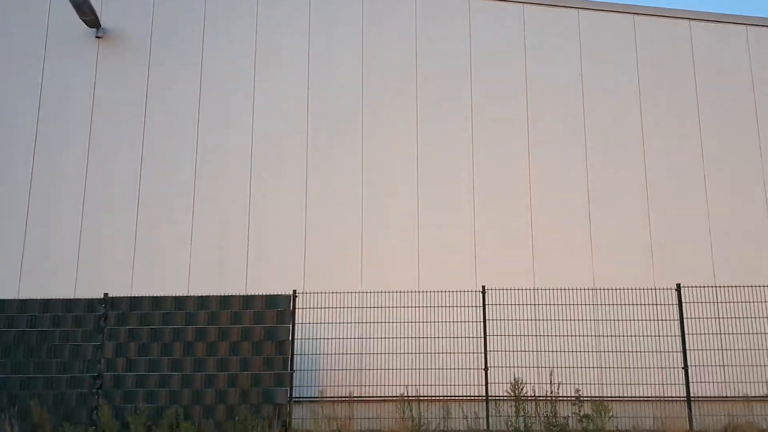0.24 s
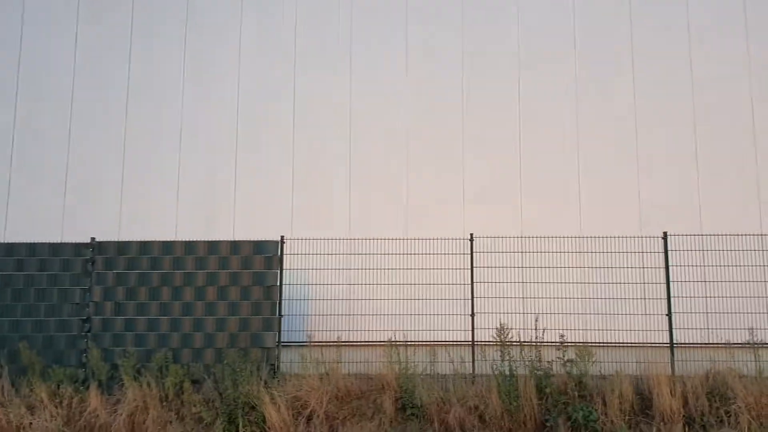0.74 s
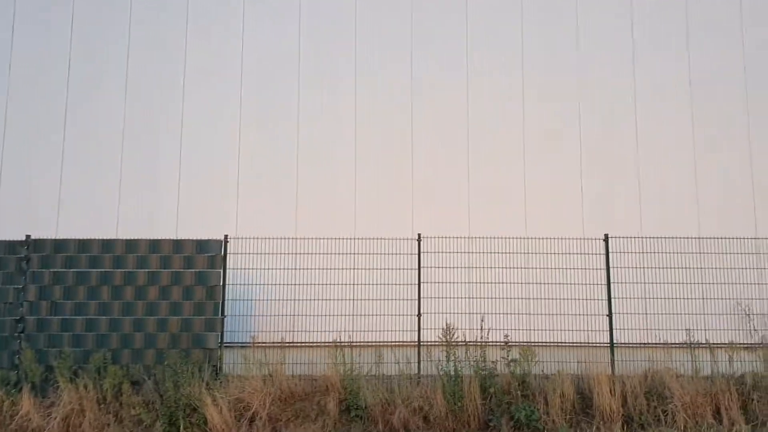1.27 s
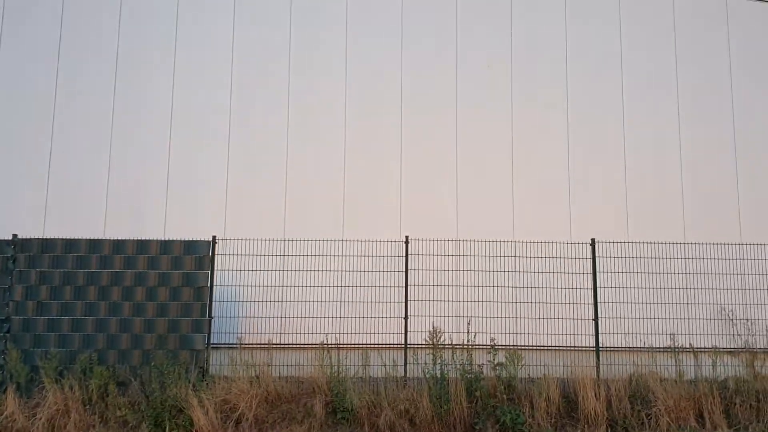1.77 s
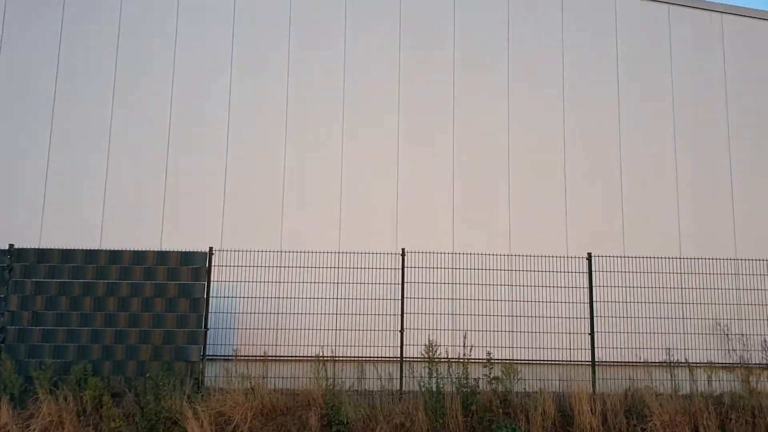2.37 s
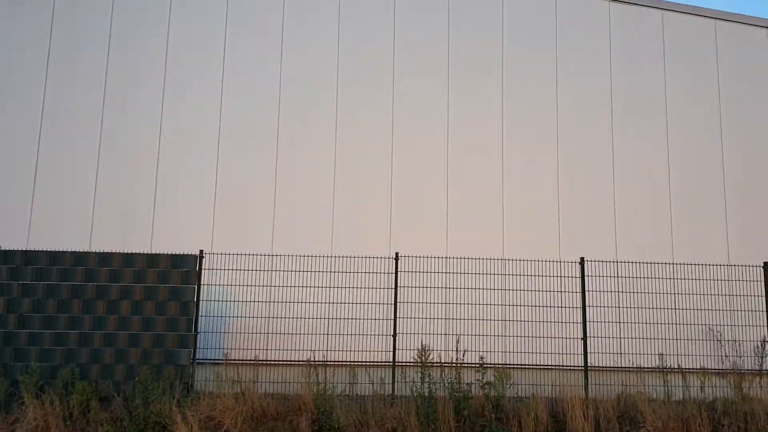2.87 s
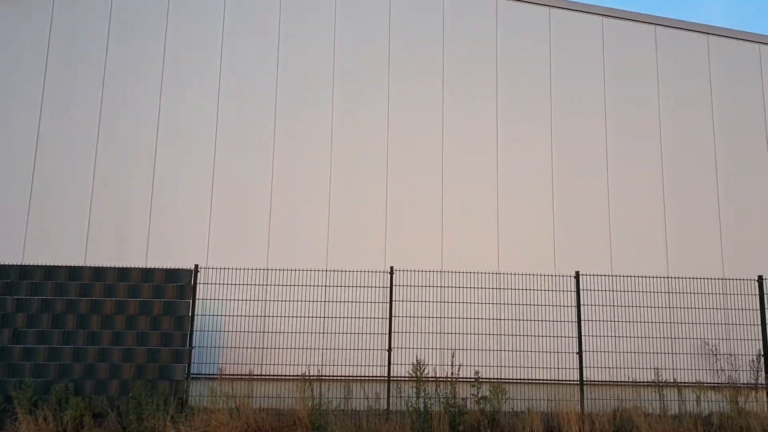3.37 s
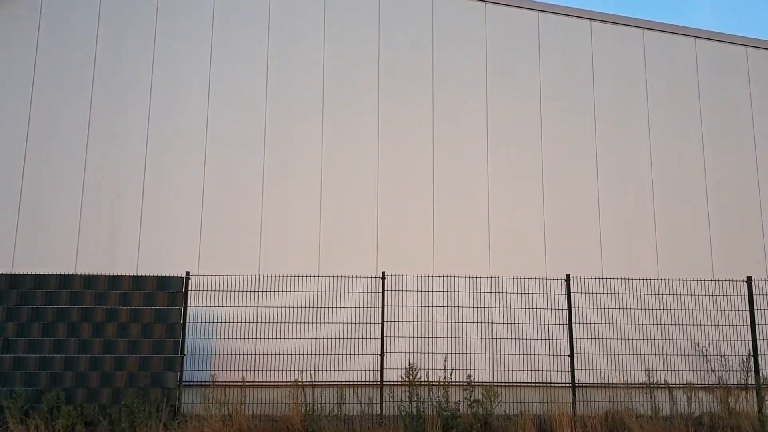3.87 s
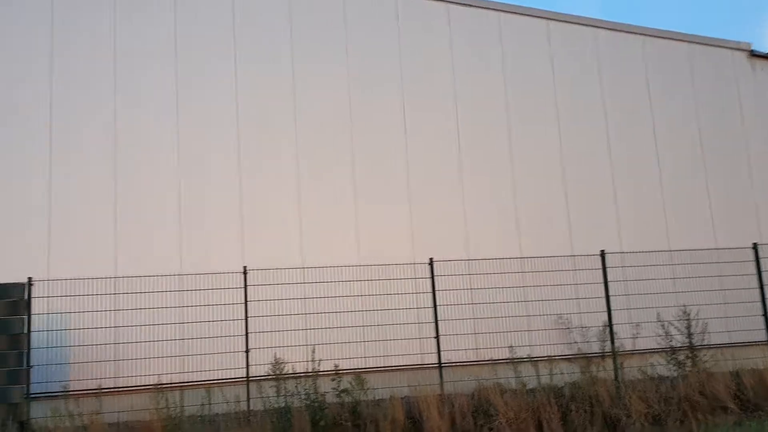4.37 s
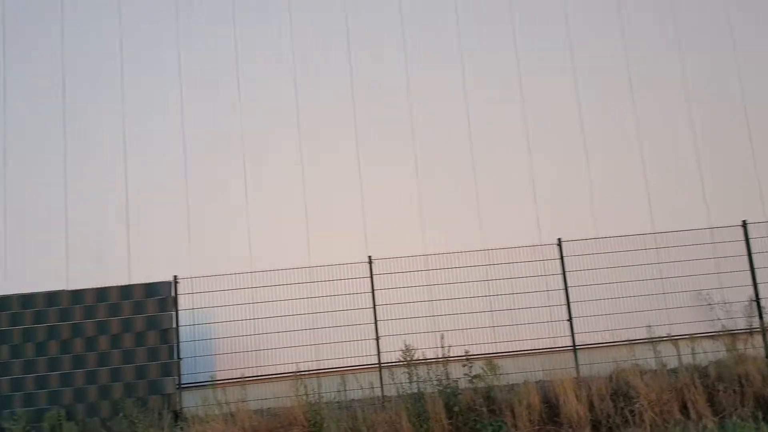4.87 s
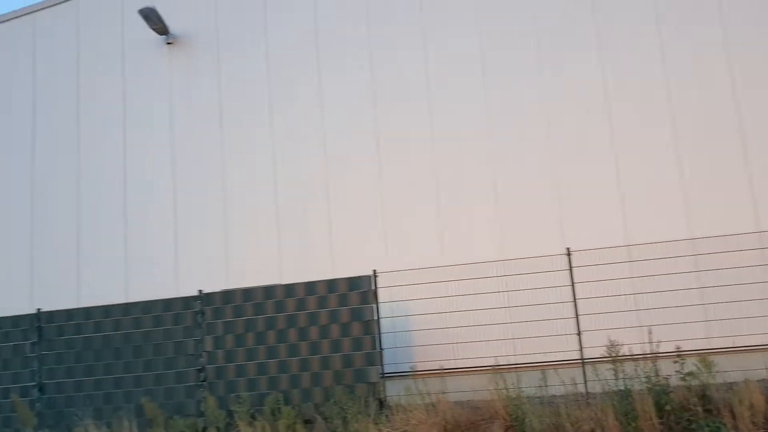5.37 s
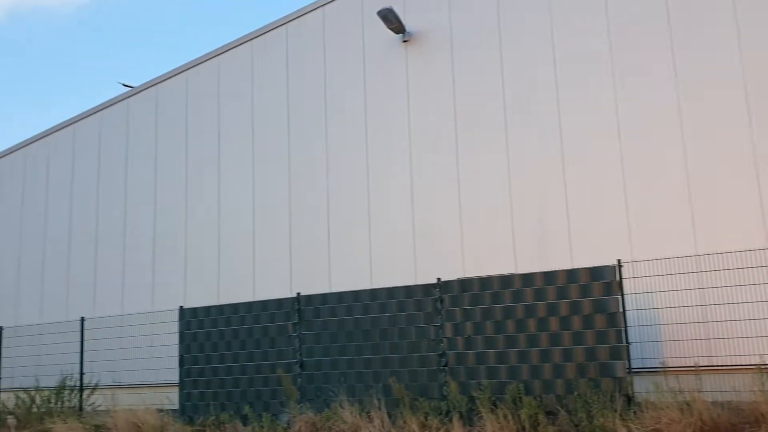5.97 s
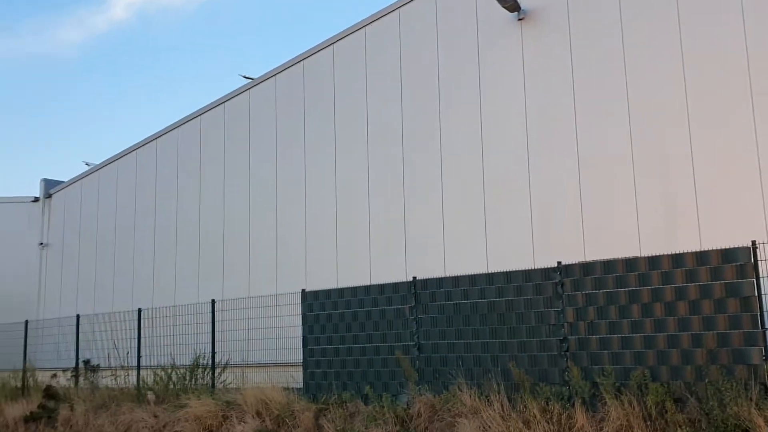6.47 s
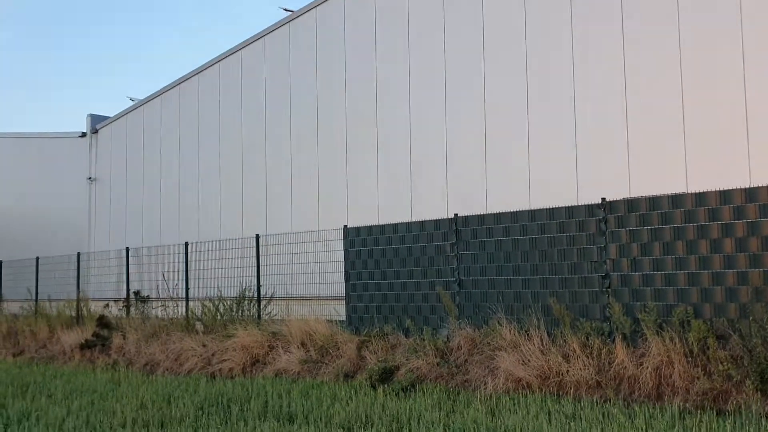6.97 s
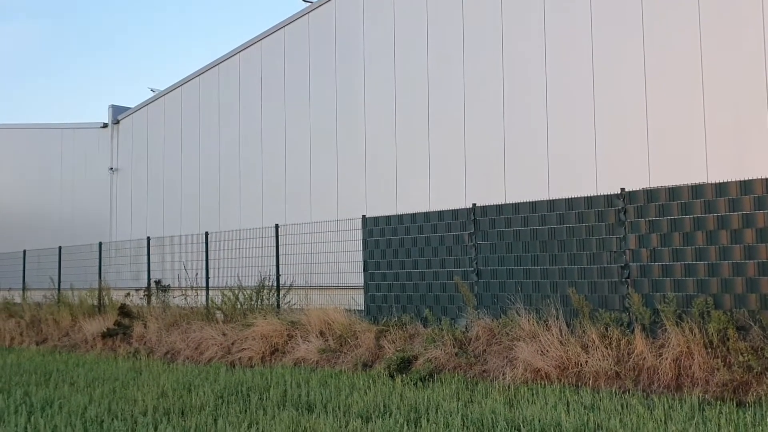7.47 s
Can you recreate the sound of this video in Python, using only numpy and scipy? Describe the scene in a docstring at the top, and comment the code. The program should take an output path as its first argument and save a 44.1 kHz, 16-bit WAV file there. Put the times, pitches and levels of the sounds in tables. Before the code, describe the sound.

Throughout, a heavy machine inside a sheet-metal hall drones on a steady low buzzing pitch of about 33 cycles a second, with faint blurred knocks, rough grinding, deep rumble and an unsteady panel boom. Its load swells gently near 1, 2.2, 3.7 and 4.9 s, easing between. Close to the hand-held stereo microphone in the field, dry grass swishes and stalks snap in crisp tiny clusters from 0.1 to 1 s; a shoe scuffs at 1.5 s, and a denser burst of rustling and cracks comes around 2 s. Sparse snaps follow from 3 to 3.75 s, then the walker stands still. A lone stalk snaps at 5.4 s. From 5.8 s the grinding surges loudly, peaking near 6.1 s while the wall throbs in quick low pulses, and falls by 6.6 s. A second, weaker surge peaks around 7.4 s and eases at the end. Soft steady hiss lies underneath.

```python
"""From the start a machine drones in a sheet-metal hall, heard from a field: sines hum on a steady rotor pitch, a faint
knock marks each turn, grinding and rumbling noise swell with the load, and a wall panel booms on an unsteady sine.
Near a hand-held two-port microphone, dry grass swishes as clumped noise and stalks snap as short rings and sizzles.
A shoe scuffs near 1.5 s; the walker stands by about 4 s, and one more stalk snaps near 5.4 s.
Near 6 s the microphone swings along the wall, and the panel throbs in a first surge; a second surge nears 7.4 s."""
import sys
import numpy as np
from scipy import signal
from scipy.fft import rfft, irfft, next_fast_len
from scipy.io import wavfile
from scipy.ndimage import uniform_filter1d, map_coordinates

SR = 44100
rng = np.random.default_rng(int(sys.argv[2]) if len(sys.argv) > 2 else 0)


def inscribe(sig):
    """Save sig as 16-bit PCM at rate SR to the path in sys.argv[1].

    A 1-D sig is mono; a 2-D sig holds one channel per row.
    Samples are clipped to [-1, 1] before scaling.
    """
    pcm = np.round(np.clip(np.atleast_2d(sig).T, -1, 1) * 32767)
    wavfile.write(sys.argv[1], SR, pcm.astype(np.int16))


def field_ratio(decibels):
    """Amplitude ratio for a level in dB (20 dB per decade); scalars and array-likes work."""
    return 10 ** (np.asarray(decibels, dtype=float) / 20)


N = 341334  # length in samples

ROTOR_HZ = 33.404  # turns a second
SURGE_DB = 7.2  # load above this is a surge
FULL_DB = 6.5  # the strong orders and the rumble stop growing this far into a surge

# Material passing through the machine, as load over idling: time_s, load_db
LOAD_CURVE = [(0, 2.5), (.58, 2.5), (1.01, 6), (1.62, 3), (1.98, 1.4), (2.2, 8), (2.55, 5.5), (3.08, 0),
              (3.45, 6.5), (3.7, 8.5), (4.1, 3), (4.6, -0.5), (4.87, 8), (5.35, 5.5), (5.73, 2), (5.8, 15),
              (5.98, 20.5), (6.12, 21), (6.27, 19.5), (6.4, 15), (6.57, 6), (7.179, 7), (7.36, 15.5),
              (7.5, 14.5), (7.62, 11), (7.74, 8.5)]
# Strong multiples of the rotor pitch: multiple, idle_db, db_per_swell_db, db_per_surge_db,
# extra_db at the walker's first spot, extra_db once the microphone has turned
STRONG_ORDERS = [(1, -40.5, 0.5, -0.06, -0.2, -0.7), (2, -43.5, 0.77, -0.26, -1.5, 3.5),
                 (3, -48.5, 1.25, -0.63, -11, 2), (4, -58, 1.89, 0.9, -7, 0),
                 (5, -55.5, 0.77, 1.5, 9.5, -5), (7, -52.5, .5, 0.74, -5.5, 0.9),
                 (8, -51.5, 0.64, 1.31, -3, -4.5), (9, -58, .5, 1.3, 4, -1.7),
                 (10, -65.5, .5, 2.13, 9.5, 3), (11, -55, 0.56, 0.52, -16, -0.7),
                 (20, -60.5, -0.04, .5, 1.5, -4.5)]
# Weaker multiples, set against their common level: multiple, relative_db
WEAK_ORDERS = [(6, -5), (12, -10), (13, -10), (14, -9), (15, -10), (16, -15), (17, -11), (18, -15),
               (19, -14), (21, -14), (22, -15), (23, -12), (24, -11), (25, -13), (26, -11), (27, -11),
               (28, -11), (29, -14), (30, -11), (31, -12), (32, -13), (33, -12), (35, -19), (36, -14),
               (37, -11), (39, -17), (41, -17)]
# Sound colours, as relative power at each pitch: pitch_hz, relative_db
CLATTER_COLOUR = [(1350, -44), (1450, 12.5), (1650, 6), (2250, -16), (2500, -33.5)]
GRINDING_COLOUR = [(90, -30.5), (185, 3), (300, -2), (416, -3), (545, -13.5), (690, -4.5), (760, -6.5),
                   (930, 0), (1050, -4), (1230, -3.5), (1380, -10.5), (1600, -21), (2280, -20.5),
                   (3100, -32), (4370, -35), (6050, -44.5), (6800, -53.5), (7600, -49.5), (8300, -62.5),
                   (9800, -65.5), (11000, -92)]
LOW_RUMBLE_COLOUR = [(22, -35.5), (40, 1.5), (60, 4), (85, 3), (120, -4), (160, -4), (250, -13), (400, -23),
                     (520, -24.5), (600, -70)]
COARSE_BLADE_COLOUR = [(2500, -19.5), (3800, 3), (5500, -2.5), (6500, -3.5), (7800, -7.5), (9000, -45.5)]
FINE_BLADE_COLOUR = [(6500, -44.5), (8000, 0), (9500, -4.5), (11500, -1), (13000, -5), (15000, 1.5),
                     (15700, -2.5), (15800, -47.5)]
SOIL_COLOUR = [(1300, -25), (1900, -3), (2600, -5.5), (3500, -4), (3900, -32.5)]
HISS_COLOUR = [(1300, -28.5), (1700, 12), (2300, 14), (2900, 3.5), (4000, -12.5), (5000, -5.5),
               (6100, -4.5), (6900, -18), (7600, -11.5), (8000, -24), (8800, -21), (11000, -18.5),
               (15700, -20), (15800, -63.5)]
# Wall panel throbbing during the first surge: peak_s, level_db, half_length_s
PANEL_THROBS = [(6.005, -30.5, .035), (6.108, -24, 0.049), (6.256, -30, .045), (6.351, -34, 0.044),
                (6.446, -25.5, .045), (6.637, -39, 0.066)]
# Grass rustle between sweeps, before the blades' common lift: time_s, level_db
RUSTLE_CURVE = [(0, -68.5), (2.3, -71.5), (2.8, -76), (4.0, -88), (4.2, -105)]
# Legs sweeping through grass, before the layer levels: peak_s, level_db, rise_s, fall_s
LEG_SWEEPS = [(.24, -77, .07, 0.058), (.45, -84, 0.066, 0.074), (.63, -80, 0.075, 0.071),
              (1.05, -69.5, 0.46, 0.065), (1.65, -75, 0.071, 0.064), (1.95, -68, 0.14, 0.078),
              (2.07, -72, 0.067, .04), (2.25, -78, 0.027, 0.06), (2.37, -76, .04, 0.036),
              (3.1, -81, .05, .04), (3.55, -82, 0.039, .07)]
# Stalks breaking, before small trims: start_s, crack_db, crack_hz, sizzle_db, left_minus_right_db
STALK_SNAPS = [(0.0712, -46.5, 5150, -62.5, -4), (0.156, -39.5, 4160, -72.5, -4),
               (0.1842, -43, 3940, -79.5, -1.5), (0.2249, -35, 5700, -60.5, -3),
               (0.2362, -33.5, 3620, -52, -5), (0.2666, -41.5, 4000, -66, -1),
               (0.4798, -41.5, 4460, -68, -3), (0.6893, -45.5, 3610, -60.5, -8.5),
               (0.7786, -38.5, 5630, -57.5, 9.5), (0.812, -48, 3650, -63, -4.5),
               (0.842, -35, 5400, -59.5, 3), (0.8884, -34, 5600, -51, -2),
               (0.9645, -50, 5680, -62.5, -18.5), (1.942, -39, 5730, -48.5, -4),
               (1.9584, -47, 3540, -55, -4.5), (1.9877, -34.5, 6500, -64.5, -2.5),
               (2.0378, -33.5, 3900, -47, -8), (2.0563, -33.5, 6400, -53.5, 1),
               (2.0758, -33.5, 4060, -71.5, -7), (2.0926, -29, 3730, -75.5, -4.5),
               (2.3396, -45, 3610, -64, -10.5), (2.4244, -49, 3820, -75.5, -15),
               (3.0412, -49, 5900, -85, 10), (3.0969, -44.5, 4330, -79, 7),
               (3.364, -48.5, 3750, -86.5, -11), (3.5054, -41.5, 4000, -56, -13.5),
               (3.525, -44, 3670, -70.5, -5), (3.5962, -45.5, 3540, -81.5, -16.5),
               (3.7566, -56, 3810, -92.5, -1), (5.3813, -43.5, 3800, -75, -1)]
# Duller knocks that go with some breaks: start_s, level_db, left_minus_right_db
STALK_THUDS = [(0.7793, -34.5, 5), (0.8422, -42.5, 1.5), (0.889, -30.5, -6), (0.965, -32.5, -9),
               (1.9427, -33, -6), (2.0388, -33.5, -9), (2.0564, -28, 1), (2.4247, -44, -11),
               (5.3807, -36.5, -4)]
# How alike the hall's noise is on the left and right: pitch_hz, likeness (1 = the same)
HALL_LIKENESS = [(60, 1), (150, 0.98), (300, .965), (640, 0.9), (1000, 0.7), (1410, .4), (3100, 0.24),
                 (6800, .15)]
# How far the left port trails the right for hall sounds: pitch_hz, lag_radians
PORT_LAG = [(60, 0.11), (150, .09), (300, 0.25), (600, 0.69), (1000, 0.93), (1640, 1.7), (2400, 0.45)]
# Difference in the two ports' colour: pitch_hz, left_minus_right_db
PORT_COLOUR = [(40, 1.0), (200, 0.1), (500, 1.4), (750, 1.3), (1100, -1.1), (1400, -4), (2380, -8),
               (4400, 4.4), (8120, -5), (15000, 2.2)]


def unit(x):
    """Scale x to an average (rms) level of 1."""
    return x / np.sqrt(np.mean(x ** 2) + 1e-20)


def along(points, hz):
    """Read a value at each pitch from (pitch, value) points on a log axis."""
    f, v = np.transpose(points)
    return np.interp(np.log(hz + 1), np.log(f + 1), v)


def over_time(points, late_s=0):
    """Join (time, value) points into one value per sample, optionally late."""
    s, value = np.transpose(points)
    return np.interp(np.arange(N) / SR - late_s, s, value)


def wobble(rate):
    """A smooth random curve through `rate` random points a second."""
    coarse = np.arange(0, N + 64, 64)
    knots = rng.standard_normal(int(N * rate / SR) + 4)
    return np.interp(np.arange(N), coarse, map_coordinates(knots, [coarse * rate / SR]))


def bumps(rows):
    """Add up smooth swells (peak s, dB, rise s, fall s) as one gain."""
    t = np.arange(N) / SR
    return sum(field_ratio(db) * np.exp(-((t - s) / np.where(t < s, rise, fall)) ** 2)
               for s, db, rise, fall in rows)


def filtered(x, response):
    """Change the level and timing of each pitch in x by a complex response."""
    m = next_fast_len(N + 8192)
    return irfft(rfft(x, m) * response(np.fft.rfftfreq(m, 1 / SR)), m)[..., :N]


def rush(spectrum, alike=HALL_LIKENESS, excite=1):
    """Coloured stereo noise at rms 1; excite shapes it in time before colouring."""
    def response(hz):
        colour = field_ratio(along(spectrum, hz)) * (hz < spectrum[-1][0])  # silent above the last point
        angle = np.arccos(np.clip(along(alike, hz), -1, 1)) / 2
        return colour * np.array([np.cos(angle), np.sin(angle)])

    mid, side = filtered(excite * rng.standard_normal((2, N)), response)
    return unit(np.array([mid + side, mid - side]))


def load(late_s=0):
    """Split the machine's load in dB into the usual swell and the surge above it."""
    now = over_time(LOAD_CURVE, late_s)
    return np.minimum(now, SURGE_DB), np.maximum(now - SURGE_DB, 0)


def rotor():
    """Count the turns made so far at a steady speed."""
    return ROTOR_HZ * np.arange(N) / SR


def first_spot():
    """Fade from 1 at the walker's first spot to 0 after leaving it."""
    leave_s, stride_s = 0.99, 0.072
    return 1 / (1 + np.exp((np.arange(N) / SR - leave_s) / stride_s))


def turned():
    """Go from 0 to 1 as the microphone swings along the wall."""
    start_s, swing_s = 5.98, 0.34
    return np.clip((np.arange(N) / SR - start_s) / swing_s, 0, 1)


def overtone_db():
    """Let the weaker orders' common level follow the load."""
    swell, surge = load()
    return -55.5 + 0.79 * swell + 0.65 * surge


def hum():
    """One sine per rotor order; the hall smears the pulse, and higher overtones waver more."""
    smear = 0.3468  # radians, times the multiple squared
    swell, surge = load(0.082)[0], np.minimum(load(0.092)[1], FULL_DB)  # each follows the load late
    angle, early, swung, weak_db = 2 * np.pi * rotor(), first_spot(), turned(), overtone_db()
    sound = np.zeros(N)
    for k, idle_db, per_swell, per_surge, early_db, turned_db in STRONG_ORDERS:
        level_db = idle_db + per_swell * swell + per_surge * surge
        level_db = level_db + early_db * early + turned_db * swung + 1.5 * wobble(3.37)
        sound += field_ratio(level_db) * np.sin(k * angle - smear * k * k)
    delays = 2 * np.pi * rng.random(len(WEAK_ORDERS))
    for (k, relative_db), delay in zip(WEAK_ORDERS, delays):
        level_db = weak_db + relative_db + (2.1 + 0.0592 * k) * wobble(2.01)
        path_waver = 0.015 * k * wobble(2)  # radians
        sound += field_ratio(level_db) * np.sin(k * angle - delay + path_waver)
    return np.sqrt(2) * sound


def clatter():
    """A faint knock once a turn, spread out by the hall's fading echoes."""
    under_db, spread_s = -20, 0.036
    knocks = np.diff(np.floor(rotor()), prepend=0)
    echoes = rng.standard_normal((2, 2000)) * np.exp(-np.arange(2000) / SR / spread_s)
    spread_out = signal.fftconvolve(knocks[None], echoes, axes=1)[:, :N]
    coloured = filtered(spread_out, lambda hz: field_ratio(along(CLATTER_COLOUR, hz)))
    return field_ratio(overtone_db() + under_db) * unit(coloured)


def grind():
    """Material grinds as noise pulsed once a turn; strong surges raise its treble further."""
    swell, surge = load()
    pulse = 1 + 0.041 * np.sin(2 * np.pi * rotor())
    level_db = -51 + swell + 1.108 * surge + 0.78 * wobble(7.1)
    sound = field_ratio(level_db) * rush(GRINDING_COLOUR, excite=pulse)
    treble = filtered(sound, lambda hz: 1 / (1 + (3320 / (hz + 1)) ** 4))
    treble_db = np.maximum(0.34 * (surge - 14), -1)  # unchanged at a 14 dB surge, 1 dB down at most
    return sound + (field_ratio(treble_db) - 1) * treble


def rumble():
    """Low noise follows the load slightly late, up to a limit in a surge."""
    swell, surge = load(0.064)
    level_db = -45.5 + 0.59 * swell + 1.34 * np.minimum(surge, FULL_DB)
    level_db = level_db + 1.5 * first_spot() + 0.6 * turned()
    return field_ratio(level_db) * rush(LOW_RUMBLE_COLOUR)


def boom():
    """A wall panel booms on an unsteady low pitch; it swells with the load and throbs at listed times from 6 s."""
    pitch_hz = 56.66 + 2.39 * wobble(10)
    panel = np.sqrt(2) * np.sin(2 * np.pi * np.cumsum(pitch_hz) / SR)
    throbs = bumps([(s, db, half, half) for s, db, half in PANEL_THROBS])
    swell = load(0.064)[0]
    return (field_ratio(-51.5 + swell) + throbs) * panel


def swish():
    """Rubbing blades and scuffed soil are clumped noise with a crackle of tiny grains."""
    rustle, sweep = field_ratio(over_time(RUSTLE_CURVE)), bumps(LEG_SWEEPS)
    grain_db = np.minimum(1.5 * rng.exponential(size=N // 40 + 1), 9)
    grains = field_ratio(grain_db.repeat(40)[:N])  # each lasts about a millisecond
    apart = [(1000, 0.056)]  # left and right are almost unrelated
    coarse = np.hypot(rustle, field_ratio(4) * sweep)
    fine = np.hypot(field_ratio(-14) * rustle, sweep)
    blades = coarse * rush(COARSE_BLADE_COLOUR, apart, grains)
    blades = blades + fine * rush(FINE_BLADE_COLOUR, apart, grains)
    scuff = bumps([(1.47, -55.5, 0.064, 0.18)])  # a shoe drags once
    soil = (field_ratio(7.5) * sweep + scuff) * rush(SOIL_COLOUR, apart, grains)
    lift_db, clump_db = 2.0, 2.1
    return field_ratio(lift_db + clump_db * wobble(40)) * blades + field_ratio(clump_db * wobble(25.94)) * soil


def hiss():
    """Far fans and the microphone's own noise form a steady hiss."""
    return field_ratio(-62.5) * rush(HISS_COLOUR, [(1000, 0.091)])


def ring(hz, db, t60):
    """A short sine that fades by 60 dB in t60 seconds."""
    t = np.arange(600) / SR
    return field_ratio(db - 60 * t / t60) * np.sin(2 * np.pi * hz * t)


def snaps():
    """A break is a crack, a sizzle and brief splinters, some with a thud; the noise differs at each port."""
    out, t = np.zeros((2, N + 700)), np.arange(600) / SR
    noises = rng.standard_normal((len(STALK_SNAPS), 2, 602))
    for (s, crack_db, crack_hz, sizzle_db, pan_db), noise in zip(STALK_SNAPS, noises):
        crack = ring(crack_hz, crack_db + 0.18, 0.0018)
        treble = np.diff(noise, n=2)  # differencing twice leaves mostly treble
        sizzle = field_ratio(sizzle_db + 4.5 - 60 * t / 0.0036) * treble
        rough = uniform_filter1d(noise, size=12)[:, 2:] * 3
        splinters = ring(crack_hz, crack_db - 9, 0.016) * rough
        start = round(s * SR) + 30  # the break comes 30 samples after its listed time
        out[:, start:][:, :600] += (crack + sizzle + splinters) * field_ratio([[pan_db / 2], [-pan_db / 2]])
    for s, db, pan_db in STALK_THUDS:
        out[:, round(s * SR):][:, :600] += ring(1700, db, 0.0034) * field_ratio([[pan_db / 2], [-pan_db / 2]])
    return out[:, :N]


def scene():
    """The hall's sounds arrive from one side; the grass is close."""
    hall = hum() + clatter() + grind() + rumble() + boom()
    hall = filtered(hall, lambda hz: np.exp(-0.5j * np.outer([1, -1], along(PORT_LAG, hz))))
    return hall + swish() + snaps()


def low_pass(x):
    """Removes everything above the highest recorded frequency."""
    return signal.sosfilt(signal.butter(12, 16520, fs=SR, output="sos"), x)


def record(dry):
    """The two microphone ports colour the scene and its steady hiss differently."""
    ports = filtered(dry + hiss(), lambda hz: field_ratio(np.outer([0.5, -0.5], along(PORT_COLOUR, hz))))
    return low_pass(ports)


dry = scene()
out = record(dry)
inscribe(out)
```